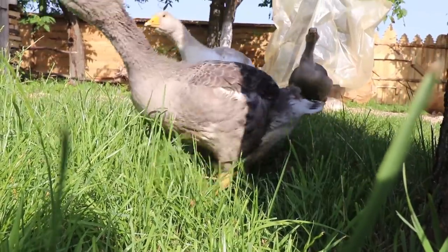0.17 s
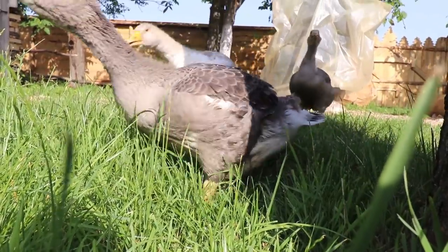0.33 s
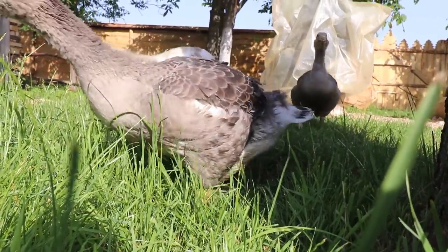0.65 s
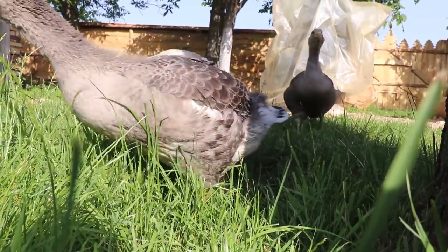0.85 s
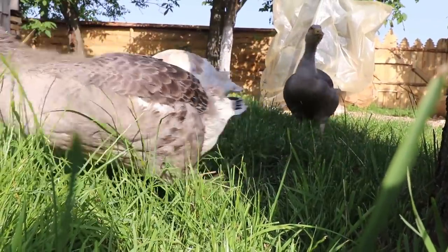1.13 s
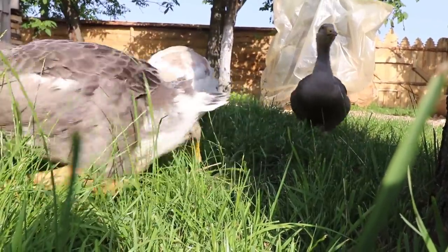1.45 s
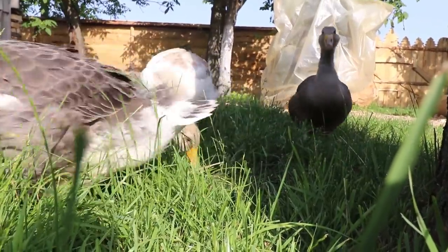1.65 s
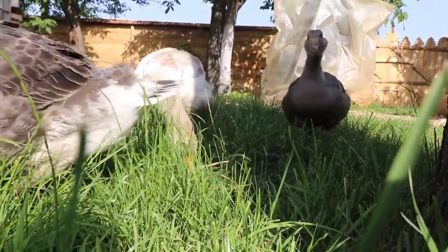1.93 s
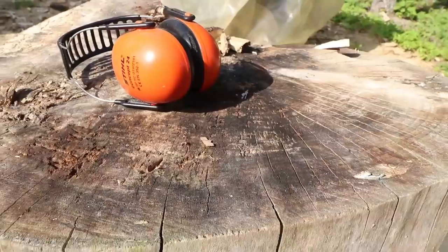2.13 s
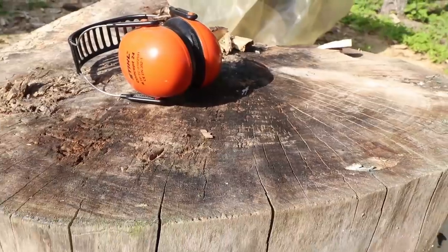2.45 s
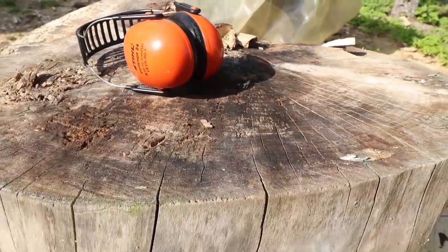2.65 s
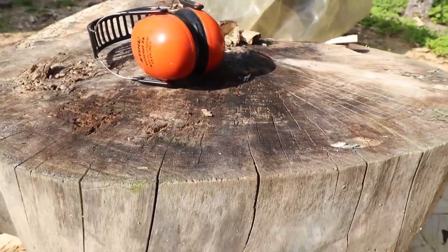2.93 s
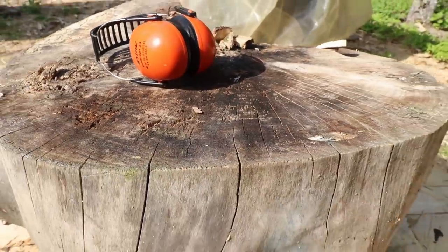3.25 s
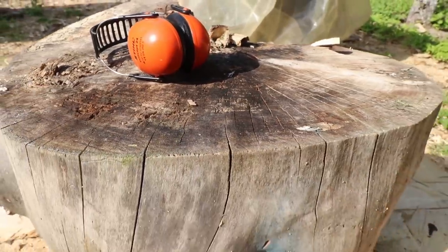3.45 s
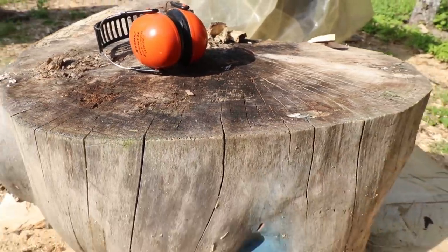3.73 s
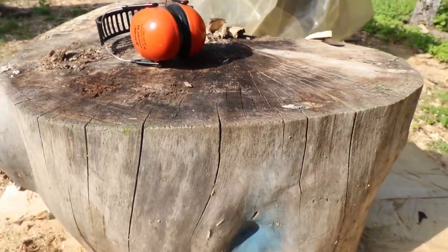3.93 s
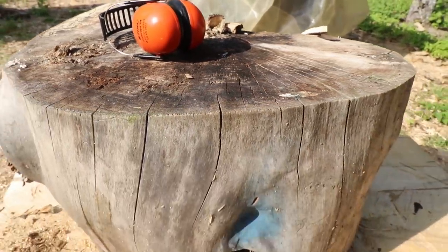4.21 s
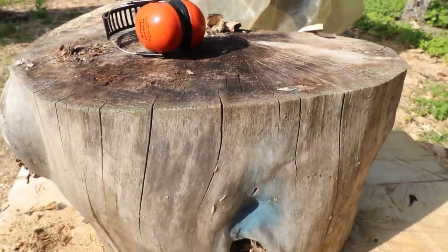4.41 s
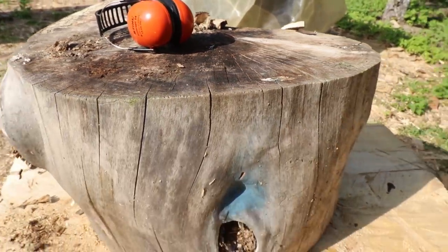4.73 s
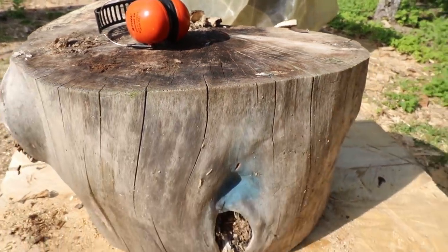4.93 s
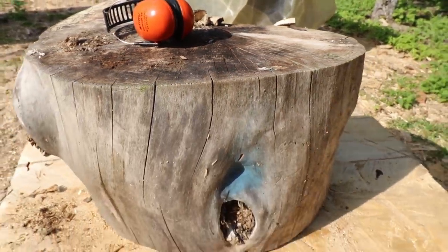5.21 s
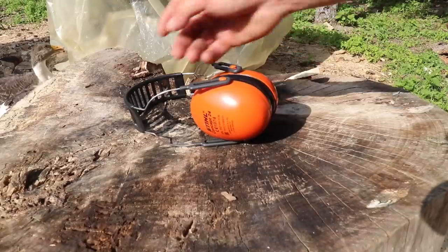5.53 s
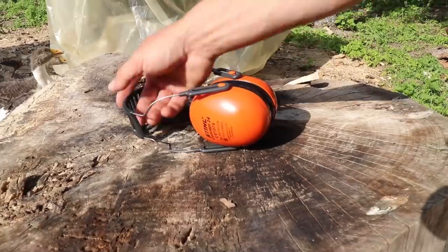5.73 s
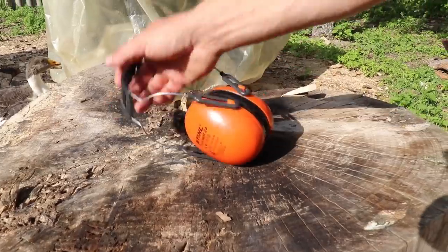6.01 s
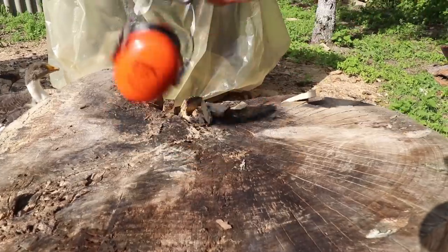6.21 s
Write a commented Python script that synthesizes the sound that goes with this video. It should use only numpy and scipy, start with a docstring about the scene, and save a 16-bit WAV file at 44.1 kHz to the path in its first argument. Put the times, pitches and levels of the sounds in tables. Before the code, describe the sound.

Geese gabble in fast, fluttering, raspy honks close by; a quiet breezy yard follows, then softer honks and a plastic scrape on wood.

```python
"""Geese in a grassy yard

Geese call in bursts of honks, mostly arched: near-pure tones that flutter, double their period and break into rasp.
Later calls begin more softly; hoarse grunts are tones with chopped noise. Small birds whistle glides and noisy chirps.
Ear defenders scrape on a stump: noise pushes ring the headband's modes. Ticks, rustles, soft swells and bumps are
shaped noise and low tones. Reflections and a scattered tail surround all these; filtered noise makes wind, hush and hiss."""
import sys
import numpy as np
from scipy import signal
from scipy.fft import rfft, irfft, next_fast_len
from scipy.io import wavfile
from scipy.ndimage import uniform_filter1d

SR = 44100
rng = np.random.default_rng(int(sys.argv[2]) if len(sys.argv) > 2 else 0)


def persist_wave(psi):
    """Save psi, clipped to +-1, as 16-bit WAV."""
    counts = np.round(np.clip(psi, -1, 1) * 32767).astype(np.int16)
    wavfile.write(sys.argv[1], SR, np.atleast_2d(counts).T)


N = 280784
T = np.arange(N) / SR  # s

# goose calls: start_s, length_s, start_pitch_hz, turning_pitch_hz, base_level_db, surge_after_start_s, surge_db,
# overtones_re_tone_db, rasp (0-1), period_doubling (0-1)
GOOSE_CALLS = [(-0.044, 0.086, 1413, 1369, -32, 0.077, 4, -34, 0.15, 0.05),
               (0.065, 0.096, 789, 1870, -27, 0.023, 12, -23.5, 0.38, 0.16),
               (0.132, 0.095, 1162, 1543, -32.5, 0.027, 10, -15, 0.55, 0.0),
               (0.464, 0.039, 1074, 1121, -33, 0.017, 8.5, -28, 0.22, 0.15),
               (0.62, 0.067, 839, 1290, -22.5, 0.0099, 1.5, -26, 0.47, 0.51),
               (0.678, 0.068, 1273, 1337, -26.5, 0.024, 15, -22, 0.44, 0),
               (0.768, 0.074, 841, 1730, -26.0, 0.018, 5, -23, 0.54, 0.25),
               (0.833, 0.066, 935, 1293, -40, 0.018, -6, -32.5, 0.5, 0.27),
               (0.881, 0.081, 921, 1840, -21.5, 0.041, 3.5, -19, 0.43, 0.01),
               (1.014, 0.097, 921, 1878, -21, 0.035, 10, -17.5, 0.39, 0.14),
               (1.062, 0.083, 896, 1318, -36, 0.044, -11, -24.5, 0.14, 0.0),
               (1.291, 0.055, 1046, 1128, -41.3, 0.025, 8.5, -9.5, 0.01, 0.34),
               (1.461, 0.09, 912, 1506, -39, 0.031, 11, -7, 0.93, 0.65),
               (1.528, 0.061, 1233, 1359, -39, 0.048, 5, -21, 0.9, 0.17),
               (1.57, 0.026, 789, 1060, -32, 0.0095, 7.5, -21, 0.83, 0.1),
               (1.596, 0.053, 1223, 1380, -34.0, 0.018, 6.5, -17, 0.9, 0.0),
               (1.649, 0.079, 995, 1645, -33, 0.022, 7, -9, 0.9, 0.55),
               (1.72, 0.081, 853, 1585, -26, 0.034, 9.5, -21, 0.22, 0.08),
               (1.796, 0.048, 1027, 1061, -33.5, 0.025, 9.5, -21.5, 0.0, 0.0),
               (1.865, 0.09, 886, 1707, -27, 0.03, 14.5, -24.5, 0.38, 0.15),
               (1.924, 0.099, 994, 1576, -27.5, 0.037, 15.5, -15.5, 0.59, 0.1),
               (2.003, 0.024, 1451, 1225, -25, 0.009, 1.5, -17.5, 0.35, 0.01),
               (2.042, 0.04, 975, 1193, -39, 0.0072, -1.5, -18, 0.8, 0),
               (4.47, 0.121, 1060, 1223, -59, 0.037, 9, -30, 0.56, 0.0),
               (4.664, 0.13, 1332, 1400, -60.5, 0.044, 7.5, -20, 0.86, 0.0),
               (5.023, 0.06, 948, 1028, -60.5, 0.018, 3, -26, 0.3, 0.06),
               (5.148, 0.0906, 1050, 1246, -43.0, 0.027, 15.5, -25.5, 0.1, 0.06),
               (5.247, 0.0852, 1047, 1230, -39, 0.014, 4.5, -37, 0.4, 0.07),
               (5.331, 0.1, 1061, 1252, -45.5, 0.014, 14, -35, 0, 0.04),
               (5.402, 0.086, 1030, 1199, -43.5, 0.023, 9, -38, 0, 0.02),
               (5.61, 0.052, 1010, 1085, -43, 0.021, 11.5, -26, 0.0, 0.0),
               (5.704, 0.086, 987, 1412, -40.5, 0.025, 1.5, -22, 0.3, 0.03),
               (5.792, 0.092, 1003, 1301, -34.5, 0.016, 7, -24, 0, 0.05),
               (5.83, 0.095, 1043, 1443, -39.5, 0.04, 9.5, -32, 0.34, 0.05),
               (5.925, 0.038, 1313, 1290, -35, 0.027, 10.5, -29, 0.24, 0.03),
               (5.984, 0.1, 1022, 1684, -40.5, 0.049, 8, -24, 0.44, 0.0),
               (6.084, 0.096, 1010, 1350, -24, 0.056, 9, -16.5, 0.33, 0.06),
               (6.144, 0.095, 1224, 1967, -33.5, 0.038, 9.5, -39, 0.67, 0.09),
               (6.176, 0.097, 1036, 1288, -40, 0.023, 10, -21, 0.1, 0.0),
               (6.301, 0.075, 1317, 2040, -38, 0.026, 19.5, -29, 0.1, 0.1)]
# colour of overtones and rasp from throat and bill: frequency_hz, gain_db
THROAT_COLOUR = [(200, -25), (450, -8.5), (720, 1.5), (1100, 3.5), (1700, 3), (2200, 3.5), (2900, -4.5),
                 (3500, -3.5), (4200, -15), (5700, -10.5), (7000, -26.5), (12000, -41)]
# low closed-bill grunts: start_s, length_s, start_pitch_hz, end_pitch_hz, level_db, hoarseness (ratio to the tone)
GOOSE_GRUNTS = [(0.435, 0.045, 141, 188, -33.5, 0.06), (.615, 0.037, 150, 140, -41, 0.18),
                (1.268, 0.039, 137, 165.4, -43, 0.03), (1.308, 0.029, 295, 266, -42.5, 1.17),
                (1.571, 0.046, 161, 135, -46.5, 0.4), (1.833, 0.031, 283, 226.6, -43.5, 0.27),
                (6.293, 0.029, 266, 248, -33.5, 0)]
# what the headband rings with: mode_hz, mode_level_db, t60_s
HEADBAND_MODES = [(2990, 3.5, 0.015), (3446, 4, 0.025), (6060, -6, .012), (7340, -18, 0.0061),
                  (8140, -2.5, 0.0084), (9400, -20, 0.0052), (10150, -19, .008), (12400, -25, .005)]
# the plastic headband catches hard on the wood: start_s, level_db
HEADBAND_CATCHES = [(6.104, -36), (6.133, -23.5), (6.168, -32.5)]
# ticks of twigs and plastic: start_s, initial_level_db, centre_hz, t60_s
DRY_TICKS = [(2.447, -44, 1700, 0.036), (2.74, -56, 1492, 0.051), (3.005, -53.5, 1570, 0.033),
             (4.053, -31.5, 1960, 0.025), (4.359, -51, 3050, 0.035), (4.62, -47.5, 2520, 0.033),
             (5.479, -51.5, 2200, 0.23), (5.529, -41.5, 1590, 0.06), (5.579, -36.5, 1640, 0.021),
             (6.254, -38, 2800, 0.15), (6.263, -36, 580, 0.048)]
# rustles and faint, soft noise swells, low to high: start_s, length_s, level_db, centre_hz, width_hz
NOISE_RUSTLES = [(-.1, 0.35, -61, 376, 191), (0, 0.45, -74, 8150, 5000), (0.862, 0.27, -61, 8900, 3490),
                 (1.214, 0.055, -65, 4900, 7160), (1.432, .3, -62, 7600, 6660),
                 (1.66, .08, -53.5, 349, 302), (5.679, 0.4, -61, 395, 300), (2.382, 0.11, -63, 1676, 982),
                 (3.732, .11, -52, 1444, 682), (4.187, 0.072, -59, 2100, 702),
                 (5.453, 0.2, -57.5, 1690, 5460), (5.681, 0.42, -70, 3850, 3000),
                 (6.045, 0.17, -43, 3340, 596), (6.04, 0.15, -57, 8400, 3000),
                 (6.069, 0.11, -39.5, 440, 580), (6.251, 0.12, -47, 460, 600)]
# soft bumps on the microphone body: start_s, length_s, pitch_hz, level_db
DULL_BUMPS = [(3.352, 0.088, 77.2, -41), (4.173, 0.16, 77.2, -37), (6.09, 0.071, 196, -52)]
# single bird chirps: start_s, length_s, start_pitch_hz, end_pitch_hz, level_db, buzz (0-1)
BIRD_CHIRPS = [(-.05, 0.12, 5440, 4913, -37.5, 0.61), (0.075, 0.019, 3750, 4920, -37, 0.37),
               (.088, 0.025, 4680, 3640, -35.5, 0.62), (.09, 0.1, 4400, 4250, -52, 0.8),
               (0.133, 0.023, 3680, 4350, -41, .05), (.32, 0.14, 4520, 4510, -77, 0.03)]
# one two-pitched bird phrase: start_in_phrase_s, length_s, pitch_hz, level_db (before the swell), buzz (0-1)
BIRD_PHRASE = [(0.0012, 0.12, 4530, -66, 0.12), (0.081, 0.074, 4520, -72, .12),
               (.09, 0.137, 6580, -75, 0.48)]
# echoes from ground, trees and fence: delay_s, gain_db
YARD_ECHOES = [(.0075, -23), (0.025, -22.5), (0.046, -34.5), (.062, -40)]
# wind on the microphone: time_s, level_db (before a common trim)
WIND_LEVEL = [(0.0, -55), (0.05, -48.5), (1.54, -55.5), (2.68, -41.5), (3.3, -48.5), (3.37, -41.5),
              (3.92, -46), (4.26, -37.5), (4.34, -47), (5.42, -47), (5.55, -36), (5.73, -50), (5.78, -40.5),
              (6.37, -42.5)]
# spectrum of the wind rumble: frequency_hz, gain_db
WIND_SPECTRUM = [(12, -22.5), (20, -7), (30, 2.5), (45, -5), (75, -4), (110, -16), (150, -27), (300, -45.5),
                 (600, -83.5)]
# spectrum of the yard's distant hush: frequency_hz, gain_db
HUSH_SPECTRUM = [(82, -30.5), (140, 2), (398, -3.5), (465, -2), (504, -6), (1220, -9), (1960, -12),
                 (4220, -13.5), (4480, -13), (5250, -16), (15500, -20.5)]
# loudness changes of the hush, some slow, some sudden: time_s, gain_db
HUSH_LOUDNESS = [(0, 6.5), (.4, -2.5), (2.0, 4.5), (2.15, 1), (5.46, 1.5), (5.49, 5.5), (6.37, 7)]
# abrupt onsets of thin top hiss: start_s, level_db (before the recorder's low-pass)
HISS_ONSETS = [(2.08, -59.5), (5.48, -65)]

# every call glides from its start pitch to a turning pitch at this share of its length, then to one resting pitch
REST_HZ, TURN_SHARE, GLIDE_POWER = 972, 0.623, 1.34
ATTACK_S, SAG_DB = 0.0075, 2.5  # fade at both ends; level lost over one call
SURGE_S, SURGE_HALVES_DB = 0.015, 34  # width at 0 dB; a surge this strong is half as wide
PUNCH_DB, PUNCH_S = 3, 0.012  # pent-up air makes the opening louder
SOFT_DB, LOUD_DB = -44.5, -25  # soft calls have no such punch, loud ones all of it
THIN_ABOVE_HZ, THIN_DB_PER_HZ = 1700, 0.02  # the voice thins at high pitch
FLUTTER, FULL_FLUTTER_HZ = 0.42, 1620  # second side of the syrinx, at full strength for turning pitches this high
SCRAPE_START_S, SCRAPE_S = 6.035, 0.125
SLIP_DB, SLIP_SCATTER_DB, SLIP_GROWTH_DB = -39.5, 6, 4
SONG_START_S, PHRASE_PERIOD_S, SONG_SWELL_DB = 2.665, 0.284, 3.5
YARD_DB, HISS_FADE_DB_PER_S = -62, 17
TOP_HZ = 15750


def undb(db):
    """Amplitude gain is the antilogarithm of decibels over 20."""
    return 10 ** (np.asarray(db) / 20)


def unit(x):
    """Normalisation to an rms of 1 lets a later gain set the level."""
    return x / np.sqrt(np.mean(x ** 2) + 1e-20)


def curve(rows):
    """Linear interpolation joins (time_s, value) rows."""
    return np.interp(T, *np.transpose(rows))


def add(out, s, x):
    """Superposition: mix x into out from time s, cropped at the ends."""
    i = int(s * SR)
    x, i = x[max(-i, 0):], max(i, 0)
    out[i:i + len(x)] += x[:max(N - i, 0)]


def colour(x, points):
    """Spectral shaping: weight the spectrum by an outline of frequency_hz and gain_db."""
    hz, db = np.transpose(points)
    size = next_fast_len(len(x) + 512)
    f = np.fft.rfftfreq(size, 1 / SR) + 1e-3  # keeps the logarithm finite
    gain = undb(np.interp(np.log(f), np.log(hz), db))
    return irfft(rfft(x, size) * gain, size)[:len(x)]


def band(x, hz, width_hz):
    """Resonance: a second-order band-pass applied twice for steep skirts."""
    hz = min(hz, SR / 2.3)
    g, k = np.tan(np.pi * hz / SR), width_hz / hz
    b = [k * g, 0, -k * g]
    a = [1 + k * g + g * g, 2 * g * g - 2, 1 - k * g + g * g]
    return signal.lfilter(b, a, signal.lfilter(b, a, x))


def walk(size, rate):
    """Smoothed chance: random values drawn rate times a second, with spread near 1."""
    k = max(int(SR / rate), 1)
    steps = np.repeat(rng.standard_normal(size // k + 1), k)
    return uniform_filter1d(steps, k)[:size] * np.sqrt(1.5)


def gliding_pitch(progress, start_hz, turn_hz):
    """Frequency glide: power-law curves join start, turning and resting pitch."""
    from_turn = np.maximum(1 - progress / TURN_SHARE, (progress - TURN_SHARE) / (1 - TURN_SHARE))
    end_hz = np.where(progress < TURN_SHARE, start_hz, REST_HZ)
    return turn_hz + (end_hz - turn_hz) * from_turn ** GLIDE_POWER


def syrinx_tone(phase, apart, surge, progress, turn_hz, shimmer=0.14, throb_db=2.0):
    """Beating of coupled sources: the second side recedes in the surge and beats outside it."""
    n = len(phase)
    flutter = FLUTTER * np.clip((turn_hz - REST_HZ) / (FULL_FLUTTER_HZ - REST_HZ), 0, 1)
    second_side = flutter * (1 - surge) * np.clip(4 * progress - 1, 0, 1)
    throb = undb(throb_db * (1 - surge) * walk(n, 130))
    first = np.sin(phase) * (1 + shimmer * walk(n, 400)) * throb
    return (first + second_side * np.sin(phase - apart)) / np.sqrt(1 + second_side ** 2)


def period_doubling(phase, hz, progress, amount, windpipe_hz, doubling_gain=0.94):
    """Subharmonics: a windpipe tone and its sum line with the voice appear at pitches near 1220 Hz."""
    n = len(phase)
    pipe = 2 * np.pi * windpipe_hz * T[:n] + .5 * walk(n, 270)
    strength = amount * np.exp(-((hz - 1220) / 170) ** 2) * np.minimum(2 - 2 * progress, 1)
    return doubling_gain * strength * (np.sin(pipe) + .5 * np.sin(phase + pipe))


def membrane_overtones(phase, edge_db, smear=0.22):
    """Harmonic spectrum of closing membranes: softer edges have a steeper slope."""
    n = len(phase)
    slope = np.clip(2.56 - (edge_db + 44) / 7, 1.3, 4)  # soft calls keep little more than the octave
    return sum(undb(4 * walk(n, 110)) * np.sin(k * phase + smear * k * walk(n, 500)) / k ** slope
               for k in np.arange(2, 6))


def honk(row, jitter=0.014, beat_hz=128, windpipe_hz=720, windpipe_width_hz=260, low_rasp_db=-22,
         edge_sag_db=4, rasp_onset_s=.008):
    """Nonlinear voice: a gliding tone gains subharmonics, beats and cycle-chopped noise."""
    _, length, start_hz, turn_hz, db, surge_at, surge_db, overtone_db, rasp, doubling = row
    n, rasp = int(length * SR), np.clip(rasp, 0, 1)
    t, progress = T[:n], np.linspace(0, 1, n)
    hz = gliding_pitch(progress, start_hz, turn_hz)
    unsteady = 1 + jitter * (1 + 2 * rasp) * walk(n, 700)
    phase = 2 * np.pi * np.cumsum(hz * unsteady) / SR

    gate = np.sin(np.pi / 2 * np.clip(np.minimum(t, t[-1] - t) / ATTACK_S, 0, 1)) ** 2
    surge_width_s = SURGE_S * .5 ** (surge_db / SURGE_HALVES_DB)
    surge = np.exp(-np.abs((t - surge_at) / surge_width_s) ** 1.6)
    punch_db = np.interp(db, [SOFT_DB, LOUD_DB], [0, PUNCH_DB]) * np.exp(-t / PUNCH_S)
    thinning_db = THIN_DB_PER_HZ * np.maximum(hz - THIN_ABOVE_HZ, 0)
    effort = gate * undb(db + punch_db + surge_db * surge - SAG_DB * (progress - .5) - thinning_db)

    apart = 2 * np.pi * np.cumsum(beat_hz * (1 + 0.22 * walk(n, 40))) / SR  # phase between the two sides
    tone = syrinx_tone(phase, apart, surge, progress, turn_hz)
    doubled = period_doubling(phase, hz, progress, doubling, windpipe_hz)

    # overtones give way to air chopped once a cycle
    edge_db = 20 * np.log10(np.sqrt(np.mean(effort ** 2))) + overtone_db
    overtones = membrane_overtones(phase, edge_db) * undb(-edge_sag_db * progress)
    chopped = rng.standard_normal(n) * (1 + .7 * np.sin(phase)) * (1 + 0.41 * np.cos(apart))
    chopped *= np.minimum(t / rasp_onset_s, 1)
    strain = effort ** 0.63 * np.sin(np.pi * progress).clip(0) ** 0.58
    blend = np.sqrt(1 - rasp * 0.93) * unit(overtones) + 2.0 * rasp * unit(chopped)
    edge = colour(strain * blend, THROAT_COLOUR)
    growl = undb(low_rasp_db) * rasp * unit(band(chopped, windpipe_hz, windpipe_width_hz))
    return np.sqrt(2) * effort * (tone + doubled + growl) + undb(edge_db) * unit(edge)


def grunt(length, start_hz, end_hz, db, hoarse, breath_hz=560, breath_width_hz=600):
    """Amplitude modulation: a low tone chops breath noise once a cycle, before a band-pass."""
    n = int(length * SR)
    phase = 2 * np.pi * np.cumsum(np.linspace(start_hz, end_hz, n)) / SR
    rough = unit(band(rng.standard_normal(n) * (1 + np.sin(phase)), breath_hz, breath_width_hz))
    voice = np.sin(phase) + 0.086 * np.sin(2 * phase) + hoarse * rough
    return undb(db) * np.sqrt(2) * np.hanning(n) * voice


def geese():
    """Superposition of all honks and the soft, sometimes hoarse grunts."""
    out = np.zeros(N)
    for row in GOOSE_CALLS:
        add(out, row[0], honk(row))
    for s, *settings in GOOSE_GRUNTS:
        add(out, s, grunt(*settings))
    return out


def slips(count=6):
    """Stick-slip friction: small uneven slips, on average harder as the drag goes on, as (start_s, level_db)."""
    along = (np.arange(count) + rng.random(count)) / count
    level_db = SLIP_DB - SLIP_GROWTH_DB * (1 - along) + SLIP_SCATTER_DB * rng.standard_normal(count)
    return list(zip(SCRAPE_START_S + SCRAPE_S * along, level_db))


def headband(contact_s=0.00048):
    """Modal excitation: each catch or slip is a short gritty push that rings the plastic."""
    out, t = np.zeros(N), T[:SR // 20]
    for s, db in HEADBAND_CATCHES + slips():
        push = rng.standard_normal(len(t)) * np.exp(-t / contact_s)
        ring = np.zeros(len(t))
        for hz, mode_db, t60 in HEADBAND_MODES:
            detuned_hz = hz * (1 + 0.0074 * rng.standard_normal())
            ring += undb(mode_db - 60 * t / t60) * np.sin(2 * np.pi * detuned_hz * t)
        knock = signal.fftconvolve(push, ring)[:len(t)]
        add(out, s, undb(db) * knock / np.std(knock[:SR // 400]))  # level of the first 2.5 ms
    return out


def ticks(tick_width=0.96):
    """Damped impact: band-limited noise dies away exponentially; width is a share of the centre."""
    out = np.zeros(N)
    for s, db, hz, t60 in DRY_TICKS:
        t = T[:int(2 * t60 * SR)]
        noise = unit(band(rng.standard_normal(len(t)), hz, tick_width * hz))
        add(out, s, undb(db - 60 * t / t60) * noise)
    return out


def rustles(grain_db=4, crackle_rate=130, crackle_db=17):
    """Granular noise: dense grains with sharper random crackles, crackle_rate a second on average."""
    out = np.zeros(N)
    for s, length, db, hz, width_hz in NOISE_RUSTLES:
        n = int(length * SR)
        strikes = rng.random(n) < crackle_rate / SR
        crackles = signal.lfilter([1], [1, -np.exp(-1 / (0.00024 * SR))], strikes)  # 0.24 ms decay
        grains = rng.standard_normal(n) * (undb(grain_db * walk(n, 500)) + undb(crackle_db) * crackles)
        add(out, s, undb(db) * unit(band(grains * np.hanning(n), hz, width_hz)))
    return out


def bumps():
    """Low-frequency pulse: a slightly unsteady sine under a smooth window."""
    out = np.zeros(N)
    for s, length, hz, db in DULL_BUMPS:
        n = int(length * SR)
        phase = 2 * np.pi * hz * T[:n] + 0.093 * walk(n, 39.9)
        add(out, s, undb(db) * np.sqrt(2) * np.hanning(n) * np.sin(phase))
    return out


def song_notes(count=8, pitch_scatter=0.00784):
    """Periodic repetition: evenly paced phrases, loudest midway; each note slides a little."""
    swell_db = SONG_SWELL_DB * (np.sin(np.pi * (np.arange(count) + .5) / count) - 1)
    detune = 1 + pitch_scatter * rng.standard_normal((count, 2))  # start and end of the slide
    return [(SONG_START_S + k * PHRASE_PERIOD_S + s, length, *(hz * detune[k]), db + swell_db[k], buzz)
            for k in range(count) for s, length, hz, db, buzz in BIRD_PHRASE]


def birds(buzz_width_hz=1700):
    """Spectral broadening: whistled glides mix with noise bands that widen with buzz."""
    out = np.zeros(N)
    for s, length, start_hz, end_hz, db, buzz in BIRD_CHIRPS + song_notes():
        n, buzz = int(length * SR), np.clip(buzz, 0, 1)
        hz = np.linspace(start_hz, end_hz, n) * (1 + 0.0037 * walk(n, 400))
        phase = 2 * np.pi * np.cumsum(hz) / SR
        harsh = unit(band(rng.standard_normal(n), (start_hz + end_hz) / 2, buzz_width_hz * max(buzz, .2)))
        note = (1 - buzz) * np.sqrt(2) * np.sin(phase) + buzz * harsh
        envelope = np.hanning(n) ** .5 * (1 + 0.25 * walk(n, 90))
        add(out, s, undb(db) * unit(envelope * note))
    return out


def yard_echo(x, tail_db, t60):
    """Reflection and scattering: convolution with single echoes and a faint decaying noise tail."""
    t = T[:SR // 2]
    response = band(rng.standard_normal(len(t)), 2270, 9000) * undb(-60 * t / t60) * np.minimum(t / 0.018, 1)
    response *= undb(tail_db) / np.linalg.norm(response)
    for delay, db in YARD_ECHOES:
        response[int(delay * SR)] += undb(db)
    return signal.fftconvolve(x, response)[:N]


def wind(trim_db=-1.5):
    """Turbulence at the microphone: low-frequency noise follows a gust envelope."""
    rumble = unit(colour(rng.standard_normal(N), WIND_SPECTRUM))
    return rumble * undb(curve(WIND_LEVEL) + trim_db)


def hush():
    """Diffuse background: spectrally shaped noise changes loudness and wavers slightly."""
    noise = unit(colour(rng.standard_normal(N), HUSH_SPECTRUM))
    return noise * undb(YARD_DB + curve(HUSH_LOUDNESS) + .5 * walk(N, 11))


def hiss():
    """High-pass noise: each abrupt onset decays exponentially."""
    high_pass = signal.butter(12, 12200, "high", fs=SR, output="sos")
    noise = unit(signal.sosfilt(high_pass, rng.standard_normal(N)))
    fading = sum((T > s) * undb(db - HISS_FADE_DB_PER_S * np.abs(T - s)) for s, db in HISS_ONSETS)
    return noise * fading


def scene():
    """Superposition of direct sounds, their echoes and the moving air."""
    near = geese() + headband() + ticks() + rustles() + bumps()
    song = birds()
    near_echo = yard_echo(near, tail_db=-40.0, t60=0.47)
    song_echo = yard_echo(song, tail_db=-11.5, t60=0.26)
    return (near + near_echo + song + song_echo + wind() + hush() + hiss())[None]


def record(dry):
    """Band limiting: the recorder's steep elliptic low-pass cuts the top."""
    return signal.sosfilt(signal.ellip(10, .1, 80, TOP_HZ, fs=SR, output="sos"), dry)


dry = scene()
out = record(dry)
persist_wave(out)
```